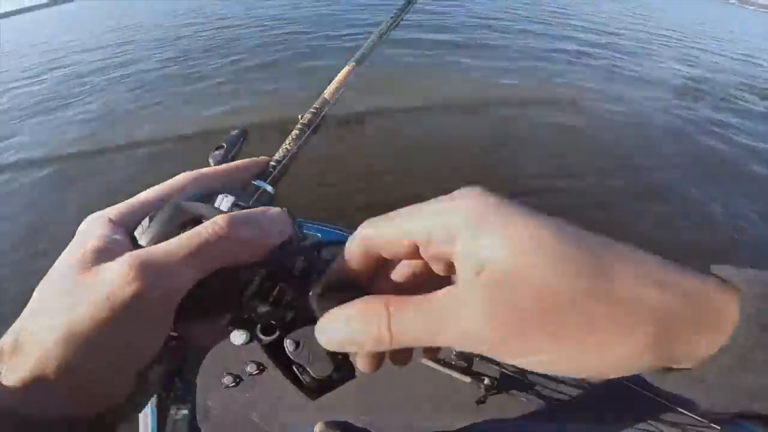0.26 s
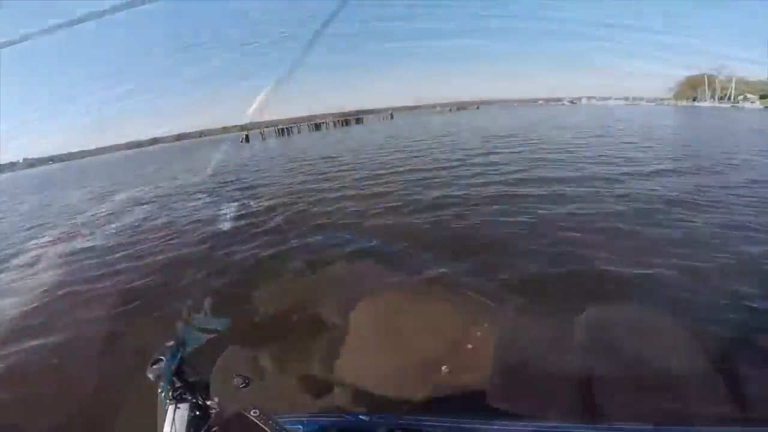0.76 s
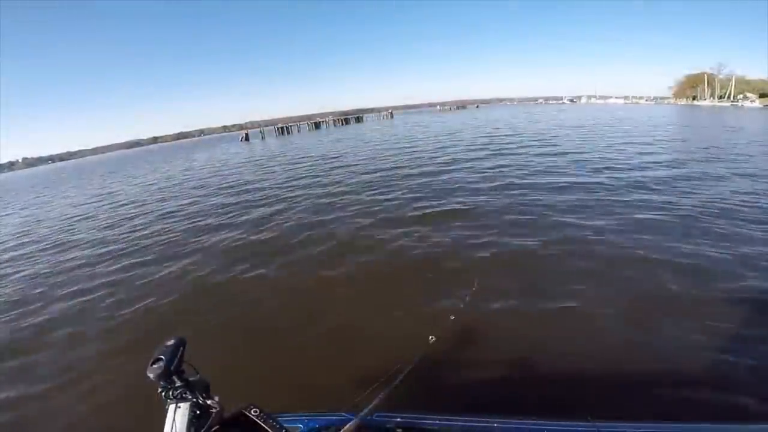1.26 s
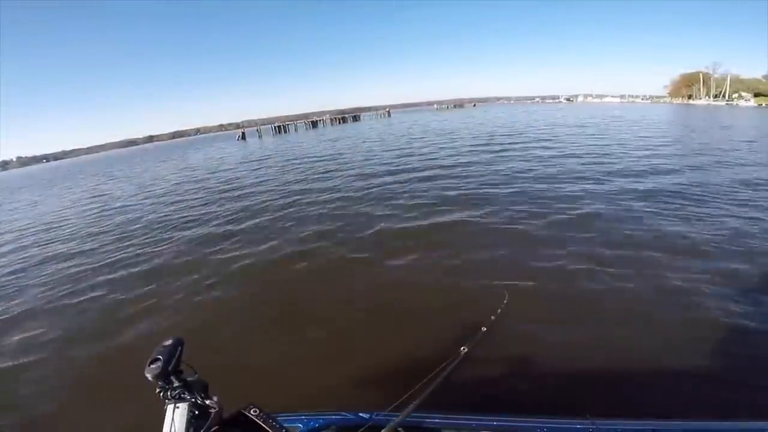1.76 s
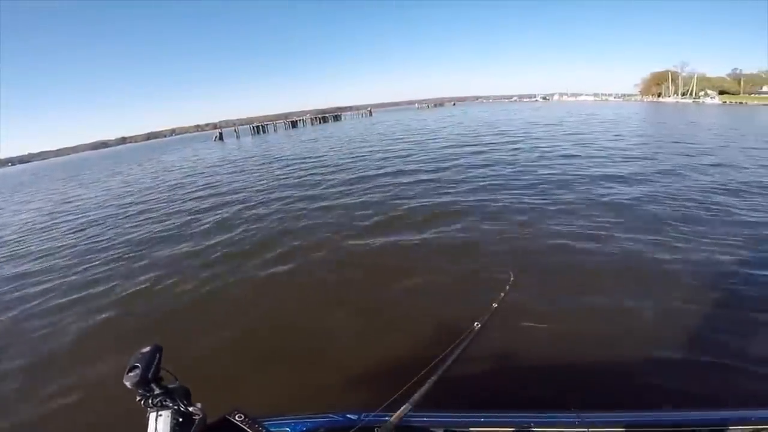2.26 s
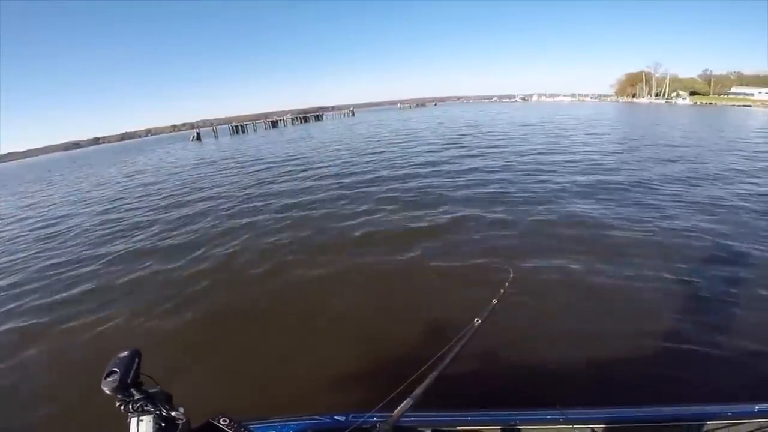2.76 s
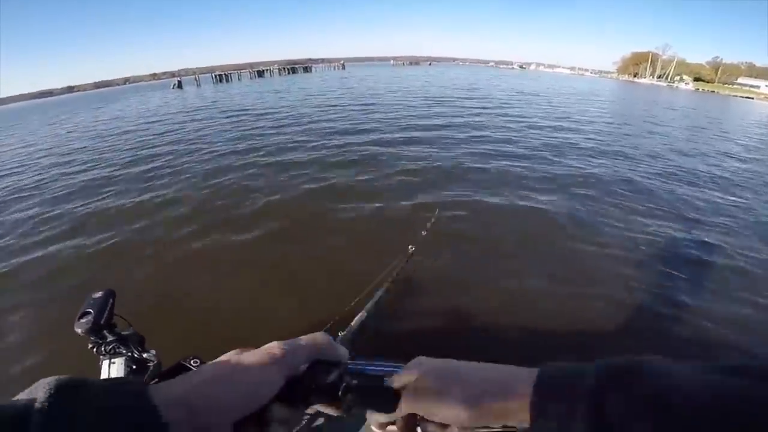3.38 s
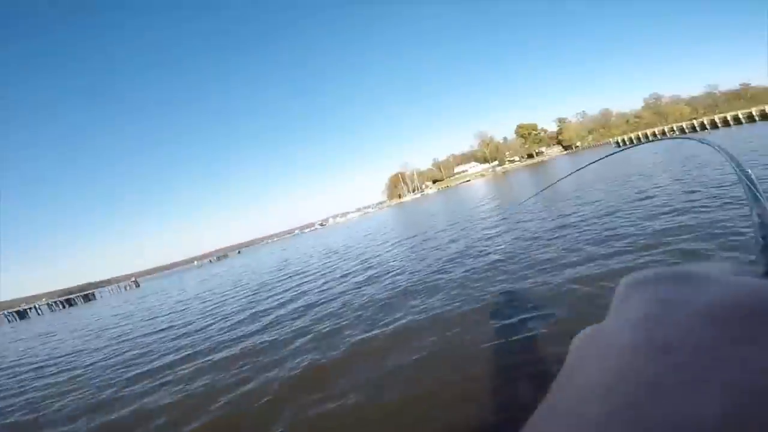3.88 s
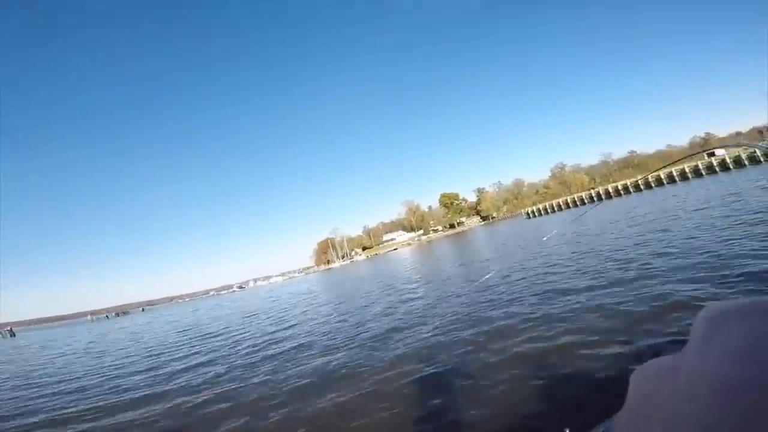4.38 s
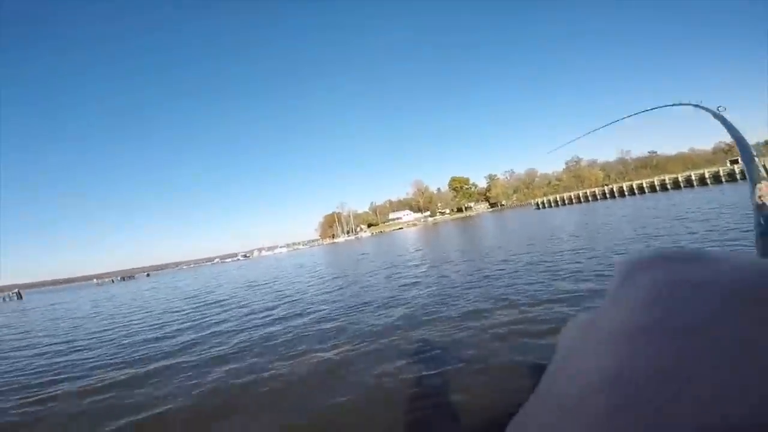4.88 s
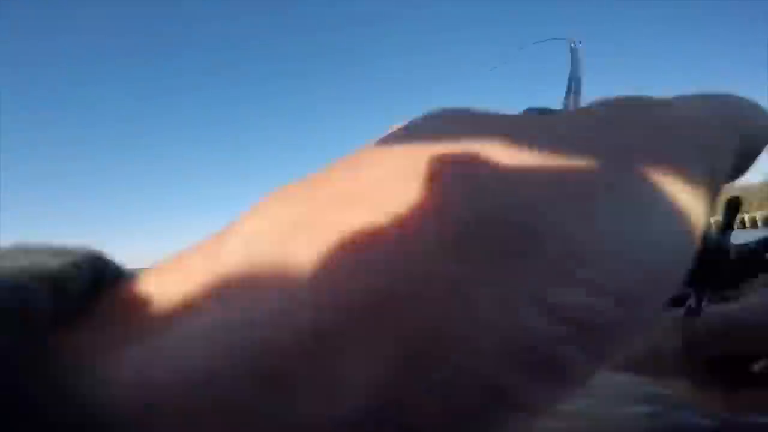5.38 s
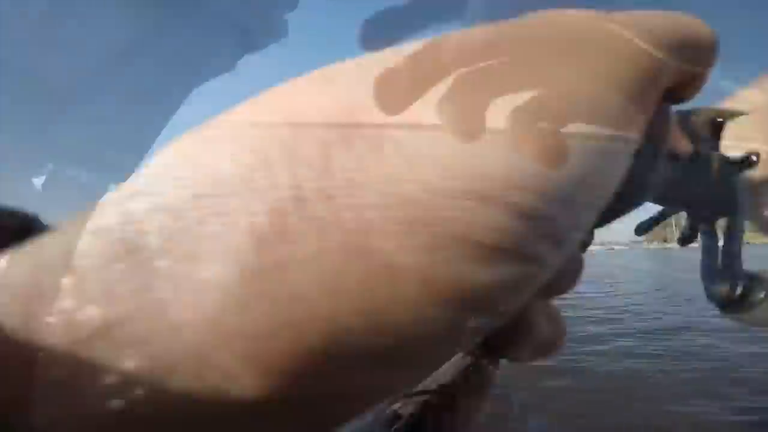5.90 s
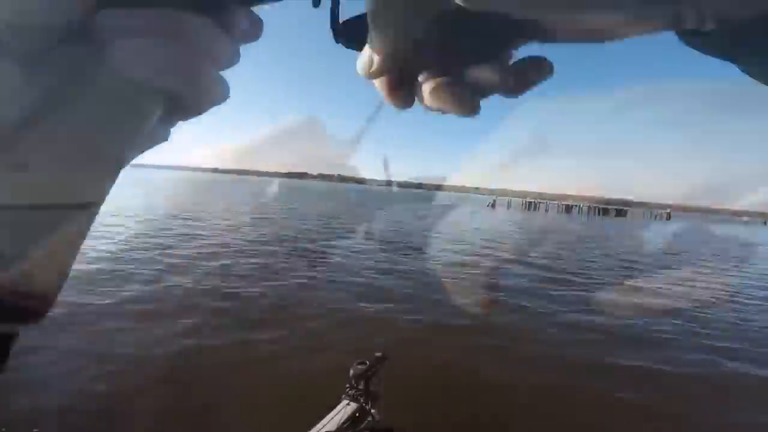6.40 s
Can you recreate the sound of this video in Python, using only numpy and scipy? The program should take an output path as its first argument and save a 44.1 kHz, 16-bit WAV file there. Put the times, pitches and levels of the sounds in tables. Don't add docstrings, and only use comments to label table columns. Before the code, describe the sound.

Outdoors on open water, heard very close to the hands. From 0 to 0.7 seconds a fishing reel ticks faintly in small pushes, with two dull bumps near 0.14 and a breathy spool whoosh dying away by 0.9. Until 3 seconds it is quiet: soft lapping, low wind buffeting, tiny drips, a plop and muted bumps around 2.0 to 2.3, another deeper plop at 2.7. From 3.1 to 3.6 slack line is wound with a grainy gear whir and light taps. At 3.6 to 3.8 the rod jerks: heavy low thumps, hard knocks and a brief rattle. Cloth rustles until 4.5, with a tiny squeak at 4.25. From 4.67 the loaded reel clatters loudly in dense, uneven bursts with short gaps, bright chinks, notably at 5.64, line hum, drag fizz and stronger wind. It weakens around 6.0 to 6.3, then knocks hollowly again until the cut at about 6.65.

```python
import sys
import numpy as np
from scipy import signal
from scipy.fft import rfft, irfft, next_fast_len
from scipy.io import wavfile
from scipy.ndimage import uniform_filter1d

SR = 44100
rng = np.random.default_rng(int(sys.argv[2]) if len(sys.argv) > 2 else 0)


def magnitude_from_level(level_db):
    exponent = np.asarray(level_db, float) / 20
    return 10 ** exponent


def inscribe(sig):
    pcm = np.round(np.clip(np.atleast_2d(sig).T, -1, 1) * 32767)
    wavfile.write(sys.argv[1], SR, pcm.astype(np.int16))


N = 293165
CREEP_S = 0.005


def ratchet():
    # f/Hz, width/Hz, level/dB
    shell_modes = [(160, 45, -15), (405, 75, -11), (705, 115, 5), (820, 140, 2)]
    pawl_modes = [(4960, 490, -6), (6096, 370, 2.5), (7300, 400, -4), (8180, 650, 3.5), (9890, 330, -3.5),
                  (11150, 1500, -4.5), (13100, 1000, -6), (14300, 390, -5.5)]
    # t/s, palm hollow/dB, spool cage/dB, top plate/dB, handle rim/dB
    reel_balance = [(4.75, 4.5, 3, -0.5, -20), (4.95, -1, -2, 2, -9), (5.2, 8, -9, 0.5, -17),
                    (5.4, 3, 7, -4, -1), (5.86, 4.5, -2, -7, -1), (5.92, 10.5, 2.5, -2.5, 0),
                    (6.3, -3, 2, -5.5, 0), (6.35, 12, 9, 9.5, 9)]
    shell_trim_db, frame_trim_db, pawl_trim_db = -1.7, -0.3, -0.18
    out = np.zeros(N)
    hollow, cage, plate, rim = along(reel_balance)
    for s, shell_db, frame_db, pawl_db in teeth():
        at = round(s * SR)
        start = s + 0.0001 - CREEP_S
        shell, shell_share = rings(seated(shell_modes))
        frame, frame_share = rings(seated(frame_at(s)))
        pawl, pawl_share = rings(seated(pawl_modes))
        shell_share = shell_share * [[1], [hollow[at]], [1], [1]]
        frame_share = frame_share * [[cage[at]], [1], [plate[at]], [plate[at] / max(rim[at], 1)]]
        pawl_share[2] *= rim[at]
        thud = struck((shell, shell_share), shell_db + shell_trim_db, 0.0004, -20, 0.006)
        knock = struck((frame, frame_share), frame_db + frame_trim_db, 0.0006, -18.5, 0.0055)
        ring = struck((pawl, pawl_share), pawl_db + pawl_trim_db, 0.0005, -18.5, 0.0038)
        add(out, start - 0.0006, thud)
        add(out, start, knock)
        add(out, start, ring)
    return out


def teeth():
    # t/s, shell level/dB, frame level/dB, pawl level/dB
    loaded_teeth = [(4.6734, -14.5, -11, -13.5), (4.6828, -10.5, -12.5, -9.5), (4.6903, -14.5, -10, -10.5),
                    (4.6936, -14, -14, -30), (4.7146, -12, -10.5, -8.5), (4.7281, -15, -14.5, -9),
                    (4.7406, -14.5, -13.5, -14.5), (4.8195, -16.5, -13.5, -18), (4.8292, -15, -13, -10.5),
                    (4.8704, -15, -14.5, -13.5), (4.8799, -16, -12, -15), (4.9076, -15, -10, -12),
                    (4.9171, -16.5, -15, -20), (4.9303, -12.5, -21, -15), (4.9374, -17, -12, -18),
                    (4.941, -21, -8.5, -22), (4.9452, -11, -21, -22), (4.9484, -13.5, -12, -9),
                    (4.9542, -16, -13, -24), (4.9581, -13, -11, -24), (4.9622, -20, -11, -13),
                    (4.9669, -18, -12, -27), (4.9708, -14, -9.5, -13.5), (4.9782, -15.5, -20, -21),
                    (4.9848, -26, -18, -23), (4.9912, -17, -16, -15.5), (5.008, -21, -14.5, -20),
                    (5.018, -18, -19, -16), (5.0272, -16, -15.5, -16.5), (5.0837, -20.5, -13.5, -17),
                    (5.0938, -18.5, -14.5, -14.5), (5.1198, -31, -19, -16.5), (5.1279, -12, -10, -15),
                    (5.145, -12.5, -14, -21), (5.1495, -25, -19, -14), (5.1563, -22, -17, -15),
                    (5.1596, -20, -15.5, -22), (5.1625, -18, -10, -15), (5.1684, -26, -9, -16),
                    (5.172, -18.5, -13, -16), (5.1741, -23, -12.5, -13), (5.1759, -13, -9, -8),
                    (5.183, -14.5, -15, -21), (5.1893, -15.5, -16, -19), (5.195, -17, -9.5, -13),
                    (5.1987, -34, -26, -31), (5.202, -17.5, -16, -12), (5.21, -19.5, -20, -23),
                    (5.232, -22, -17.5, -17), (5.2416, -23, -21, -21), (5.2658, -33, -37, -28),
                    (5.294, -17, -12.5, -15), (5.3767, -19, -14.5, -19), (5.382, -17, -15.5, -16.5),
                    (5.3863, -14.5, -13, -14), (5.3927, -18, -11.5, -11), (5.4001, -12, -13, -15),
                    (5.519, -29, -16.5, -19), (5.525, -18.5, -15.5, -11.5), (5.5327, -23, -10, -19),
                    (5.541, -26, -15.5, -14), (5.5496, -31, -19, -18), (5.5538, -16.5, -13.5, -10.5),
                    (5.5575, -18, -12, -10), (5.5628, -13.5, -8, -11.5), (5.568, -21, -14, -21),
                    (5.5711, -19, -9.5, -12), (5.5779, -20, -16, -17), (5.587, -21, -16, -15),
                    (5.593, -16, -19, -12.5), (5.599, -17, -12, -14), (5.604, -18, -15, -11),
                    (5.6127, -22, -18.5, -17.5), (5.6189, -27, -32, -45), (5.6437, -51, -32, -25.5),
                    (5.7154, -26, -15, -15), (5.7236, -18, -9.5, -16), (5.7357, -24, -13, -10.5),
                    (5.7437, -16, -19, -15), (5.7479, -24, -8.5, -12), (5.7517, -13.5, -11.5, -12),
                    (5.7559, -18, -11.5, -16), (5.759, -15, -12, -20),
                    (5.7629, -22, -13, -13), (5.767, -18, -12, -11), (5.7725, -15, -13.5, -10.5),
                   (5.7794, -15.5, -14, -15), (5.7995, -24, -14, -16), (5.8088, -21.5, -17.5, -18.5),
                   (5.8242, -30, -39, -31), (5.8333, -24, -15.5, -17.5), (5.856, -28, -16, -22),
                   (5.8615, -24, -12, -12), (5.87, -18, -15.5, -15.5), (5.8892, -24, -18, -28),
                   (5.969, -17.5, -23, -17), (5.976, -32, -26, -27), (5.9849, -33, -27.5, -29),
                   (6.0766, -39, -22, -24.5), (6.0845, -35, -23, -21), (6.0917, -25.5, -17, -21),
                   (6.1024, -27, -20, -20), (6.1112, -21, -23, -18), (6.1173, -21, -18, -23),
                   (6.12, -23, -22, -19), (6.125, -27, -20, -19), (6.129, -23.5, -20, -16.5),
                   (6.1347, -24, -25, -20), (6.1396, -22, -23, -20), (6.1595, -32, -22.5, -26.5),
                   (6.2365, -32, -20.5, -26.5), (6.2425, -26, -19.5, -23), (6.252, -32, -27, -30),
                   (6.2658, -30, -21, -22.5), (6.2743, -32, -25, -28), (6.2784, -20, -20, -25),
                   (6.2828, -21.5, -22, -22), (6.2878, -23, -17.5, -21), (6.293, -31, -28, -27),
                   (6.299, -22.5, -36, -23),
                    (6.3051, -23, -22, -23), (6.3109, -30, -15, -18.5), (6.3243, -39, -29, -31),
                  (6.3315, -34, -36, -26), (6.3513, -30, -9.5, -15), (6.3613, -30, -12, -17.5),
                  (6.3711, -20.5, -11, -16), (6.3952, -21, -17, -19), (6.4002, -19.5, -9, -10),
                  (6.409, -21.5, -16, -15.5), (6.5536, -26, -17, -13.5), (6.5635, -31, -5, -12.5),
                  (6.5902, -21, -6.5, -12), (6.5984, -25, -10, -21), (6.605, -19, -8, -12),
                  (6.612, -20.5, -11.5, -14), (6.633, -20, -17, -18), (6.6394, -19, -8, -10)]
    # first tooth t/s, last tooth t/s, count, shell/dB, frame/dB, pawl/dB
    fast_runs = [
        (5.895, 5.9077, 6, -19, -15, -16.5),
        (5.9135, 5.927, 8, -19, -15.5, -16),
        (5.929, 5.964, 15, -21, -17.5, -17.5),
    ]
    slowing, stumble = 1.05, 0.09
    frame_spread_db, pawl_spread_db = 1.6, 2.4
    rows = loaded_teeth
    chances = rng.standard_normal((len(fast_runs), 20, 3))
    for (first, last, count, shell_db, frame_db, pawl_db), chance in zip(fast_runs, chances):
        late, knock, ring = chance[:count].T
        step = np.linspace(0, 1, count)
        stray = stumble * late * np.sin(np.pi * step) ** 0.5 / (count - 1)
        times = first + (last - first) * (step ** slowing + stray)
        knock = frame_spread_db * knock
        rows += zip(times, shell_db + knock, frame_db + knock, pawl_db + pawl_spread_db * ring)
    return rows


def frame_at(s):
    # f/Hz, width/Hz, level/dB
    frame_modes = [(1660, 250, 3), (2044, 490, 7), (2830, 570, 7.5), (3710, 120, -6)]
    lower_from_s, plate_ratio = 6.34, 0.88
    modes = np.array(frame_modes, float)
    modes[2, 0] *= plate_ratio if s > lower_from_s else 1
    return modes


def seated(modes):
    off = 0.02 * rng.standard_normal(len(modes))
    return [(hz * (1 + shift), width, db) for (hz, width, db), shift in zip(modes, off)]


def rings(modes, size=700):
    t = np.arange(size) / SR
    hz, width, db = np.transpose(modes)[:, :, None]
    decay = t * np.exp(-2 * np.pi * width * t)
    return decay * np.sin(2 * np.pi * hz * t), magnitude_from_level(db)


def struck(body, db, length_s, tail_db, tail_s, size=1100):
    modes, share = body
    t = np.arange(size) / SR - CREEP_S
    creep = -t + (t / 0.0011) ** 4 * length_s
    slip = np.exp(-np.where(t > 0, t, creep) / length_s)
    buzz = magnitude_from_level(tail_db) * np.exp(-np.where(t > 0, t / tail_s, 1.2 - t / 0.0012))
    scrape = (slip + buzz) * rng.standard_normal((len(modes), size))
    bite = 0.8
    scrape[:, round(CREEP_S * SR)] += bite * np.sqrt(length_s * SR) * rng.choice([-1, 1])
    parts = signal.fftconvolve(scrape, modes, axes=1)
    share = share * magnitude_from_level(2.4 * rng.standard_normal(share.shape))
    sound = (share * parts / np.linalg.norm(parts, axis=1, keepdims=True)).sum(0)
    peak = np.sqrt(uniform_filter1d(sound ** 2, size=60).max())
    return sound * magnitude_from_level(db) / peak


def ticking():
    # middle t/s, half length t/s, level/dB
    pushes = [
        (0, 0.0099, -49),
        (0.124, 0.035, -56),
        (0.212, 0.037, -60),
        (0.34, 0.1, -54.5),
        (0.578, 0.084, -64),
    ]
    ticks_per_s, end_s = 110, 0.66
    at = np.arange(0, end_s, 1 / ticks_per_s)
    out = np.zeros(N)
    pawl = rings([(3750, 380, -2.5), (6100, 260, 5), (8200, 400, -1.5)])
    for when, push, (late, uneven) in zip(at, swells(pushes, at)[0], rng.standard_normal((100, 2))):
        tick = struck(pawl, 3.4 * uneven, 0.00047, -26, 0.0027)
        add(out, when + 0.0008 * late, push * tick)
    return out


def spool():
    # t/s, level/dB
    coast = [(0, -52.5), (.2, -51.5), (.45, -51.5), (.65, -57), (.8, -62), (.9, -100)]
    # f/Hz, level/dB
    spool_spectrum = [(500, -3), (700, 0), (1150, -7), (1280, -2.5), (1500, -7), (2100, -11.5),
                      (2700, -21.5), (5000, -33), (10000, -29), (15000, -50)]
    whoosh = colour(grains(110, 2.4, 0.67), spool_spectrum)
    whistles = 0.21 * wavering(1290, 25) + 0.2 * wavering(1950, 30)
    return along(coast)[0] * evened(lumps(70, 0.84) * (whoosh + whistles))


def gears():
    # t/s, level/dB
    winding = [(3, -100), (3.05, -66), (3.14, -56), (3.205, -59), (3.225, -53), (3.32, -49.5), (3.37, -52),
               (3.43, -55.5), (3.5, -57), (3.56, -63), (3.62, -100)]
    # f/Hz, level/dB
    gear_spectrum = [(1200, -9.5), (1750, -2), (2100, 4), (2550, -5.5), (3300, -12.5), (4000, -19),
                     (4650, -13.5), (5500, -22), (6600, -16), (7500, -21), (8300, -16), (9100, -25),
                     (9850, -11.5), (10800, -28), (15000, -32)]
    return along(winding)[0] * evened(meshing() * colour(rng.standard_normal(N), gear_spectrum))


def meshing():
    mesh_per_s, depth_db, spread_db = 216, 14, 3
    turns = np.cumsum(mesh_per_s * lumps(12, 0.4)) / SR
    tooth = rng.standard_normal(2000)[turns.astype(int) % 2000]
    return uniform_filter1d(magnitude_from_level(spread_db * tooth - depth_db * (turns % 1)), size=40)


def line():
    # f/Hz, level/dB
    hum_spectrum = [(400, -21), (850, -8), (1350, -11), (1600, -2), (2150, -3), (2500, -11), (3200, -12),
                    (3700, -19), (6000, -32)]
    fizz_spectrum = [(2500, -16), (4500, -4), (5500, -3), (7300, -7), (9200, 4), (10500, -9), (12500, -17),
                     (15000, -14)]
    hum_level, fizz_level = strain()
    whirr = colour(grains(220, 1.4, 0.4), hum_spectrum)
    whistles = 0.6 * wavering(1650, 90) + 0.6 * wavering(1950, 110)
    hum = hum_level * evened(lumps(53, 2.2) * (whirr + whistles))
    fizz = lumps(45, 2.5) * colour(grains(160, 4.5, 0.5), fizz_spectrum)
    return hum + fizz_level * evened(fizz)


def strain():
    # t/s, level/dB
    line_load = [(3.56, -63), (4.1, -66.5), (4.65, -62.5), (4.85, -42), (5.3, -41), (5.8, -37), (6, -49.5),
                 (6.2, -44), (6.35, -37), (6.65, -39)]
    # middle t/s, half length t/s, hum/dB, fizz/dB
    rubs = [(3.615, 0.037, -48.5, -52), (3.69, 0.019, -40, -42), (3.74, 0.031, -54, -52),
            (3.81, 0.017, -52, -51), (4.27, 0.05, -62, -70), (4.51, 0.052, -68, -72),
            (4.76, 0.095, -56, -69), (5.42, 0.032, -38.5, -43), (5.505, 0.023, -42, -45),
            (5.7, 0.033, -45, -47), (5.88, 0.12, -48, -48.5), (6.05, 0.033, -51, -56),
            (6.535, 0.016, -46, -46)]
    fizz_under_db = -18.5
    pull = along([(line_load[0][0] - 0.05, -110)] + line_load)[0]
    hum, fizz = swells(rubs, np.arange(N) / SR)
    return pull + hum, pull * magnitude_from_level(fizz_under_db) + fizz


def wavering(hz, width_hz):
    fuzz = colour(rng.standard_normal(N), [(width_hz, 0), (2 * width_hz, -30)])
    return fuzz * np.sin(2 * np.pi * np.cumsum(hz * lumps(5, 0.45)) / SR)


def thumps():
    # t/s, peak level/dB, f/Hz, t60/s
    blows = [(0.143, -20.5, 133, 0.095), (0.134, -22.5, 313, 0.036), (3.575, -13.5, 9.8, 0.24),
             (4.07, -30.5, 117, 0.11), (5.53, -28.5, 133, 0.18), (5.6, -21.5, 190, 0.085),
             (6.41, -32, 270, 0.085), (2.01, -32, 136, 0.21), (2.17, -28, 130, 0.13),
             (3.555, -30.5, 225, 0.099), (3.692, -6, 11, 0.38), (3.694, -19, 160, 0.067),
             (3.726, -3.5, 61, 0.033), (3.8142, -13.5, 222, 0.042), (3.8128, -10.5, 730, 0.0086),
             (3.8135, -13, 79, 0.1), (4.5, -30.5, 8.2, 0.48)]
    return bursts(blows, 0.02, -0.42)


def bursts(rows, rise_cycles, glide):
    out = np.zeros(N)
    for s, db, hz, t60 in rows:
        t = np.arange(round(t60 * SR)) / SR
        start = 1 - np.exp(-t * hz / rise_cycles)
        tone = np.sin(2 * np.pi * hz * t * (1 + glide * t / t60))
        add(out, s, magnitude_from_level(db - 60 * t / t60) * start * tone)
    return out


def rod_knocks():
    # t/s, low level/dB, low ring f/Hz, high level/dB
    jerk_knocks = [(3.6241, -32.5, 2230, -42), (3.6342, -29, 2100, -43), (3.635, -36, 3850, -48),
                   (3.6499, -30, 2060, -44), (3.6892, -25, 2170, -33), (3.696, -19, 3720, -29),
                   (3.6992, -29, 2400, -28), (3.7031, -22.5, 2430, -31), (3.7116, -34, 1500, -35),
                   (3.7158, -19, 2020, -49), (3.7264, -25.5, 2600, -34), (3.7333, -36, 2690, -38),
                   (3.7638, -45, 2690, -45), (3.768, -60, 2700, -45), (3.7846, -38, 2780, -45),
                   (3.7991, -46, 2700, -43), (3.8135, -31.5, 2720, -39), (3.8693, -53, 2710, -51),
                   (4.478, -45, 4000, -53), (4.5012, -42.5, 2590, -41), (4.6195, -46, 2480, -45.5)]
    return hard_parts(jerk_knocks, 8700)


def taps():
    # t/s, low level/dB, low ring f/Hz, high level/dB
    light_taps = [(.1092, -57, 3300, -62), (.1396, -59, 3000, -60), (.2049, -58, 3500, -60),
                  (.2224, -57, 3000, -62), (.2987, -63, 3500, -58), (.3162, -63, 3200, -59),
                  (.4025, -57, 3300, -52), (.7502, -58, 2600, -66), (3.1411, -56, 2100, -60),
                  (3.2415, -53, 2100, -60), (3.3365, -51, 2100, -59), (3.4788, -58, 4300, -61),
                  (.7319, -57, 2600, -54), (.7696, -70, 1210, -60), (1.0206, -55.5, 4640, -70),
                  (1.9986, -50.5, 2530, -66), (2.707, -56.5, 2580, -68), (3.0726, -53, 2400, -65),
                  (3.1838, -59, 1920, -55), (3.2955, -49, 2110, -55), (3.3876, -48, 1870, -55),
                  (3.4064, -43, 3120, -43.5), (4.0249, -52, 1210, -53)]
    return hard_parts(light_taps, 5570)


def snap_ring():
    # t/s, low level/dB, low ring f/Hz, high level/dB
    rattles = [
        (3.69, -45, 6200, -33),
        (3.7125, -43, 6000, -32),
        (3.755, -47, 6000, -54),
    ]
    return hard_parts(rattles, 13600)


def hard_parts(rows, high_hz):
    out = np.zeros(N)
    for s, low_db, low_hz, high_db in rows:
        low = rings([(low_hz, 350, 0), (0.42 * low_hz, 1500, -7)])
        high = rings([(high_hz, 700, 0), (0.74 * high_hz, 2500, -5)])
        add(out, s - CREEP_S, struck(low, low_db, 0.00036, -20, 0.0079))
        add(out, s - CREEP_S, struck(high, high_db, 0.00035, -19, 0.0046))
    return out


def chinks():
    # t/s, level/dB
    knob_chinks = [(4.7573, -33), (4.7948, -40), (4.8016, -38), (5.2663, -25), (5.4262, -29.5),
                   (5.4585, -32), (5.463, -26), (5.644, -17.5), (5.6645, -38), (5.6836, -40), (5.8449, -33),
                   (5.855, -25), (6.0035, -44), (6.0088, -40), (6.536, -38)]
    out = np.zeros(N)
    for s, db in knob_chinks:
        pin = rings(seated([(11200, 1000, -4), (14100, 1100, -1), (8500, 1500, -10)]))
        add(out, s - CREEP_S, struck(pin, db, 0.0005, -24, 0.003))
    return out


def squeak():
    # t/s, f/Hz, level/dB
    grip_squeak = [(4.24, 760, -70), (4.255, 830, -59), (4.285, 1000, -57), (4.3, 900, -70)]
    s, hz, db = np.transpose(grip_squeak)
    t = np.arange(s[0], s[-1], 1 / SR)
    turn = 2 * np.pi * np.cumsum(np.interp(t, s, hz)) / SR
    tone = np.sin(turn) + 0.25 * np.sin(2 * turn) + np.sin(3 * turn)
    out = np.zeros(N)
    add(out, s[0], magnitude_from_level(np.interp(t, s, db)) * tone)
    return out


def jacket():
    # middle t/s, half length t/s, level/dB
    creases = [(3.87, 0.037, -47.5), (3.96, 0.055, -51), (4.17, 0.076, -54), (4.28, 0.049, -49.5),
               (4.38, 0.042, -53.5), (4.51, 0.087, -51)]
    # f/Hz, level/dB
    cloth_spectrum = [(300, -16), (700, 3.5), (1100, -1.5), (1700, -13), (2800, -13), (3800, -25),
                      (5400, -20.5), (7000, -41)]
    rustle = evened(lumps(40, 2.7) * colour(grains(270, 4.0, 1.0), cloth_spectrum))
    return swells(creases, np.arange(N) / SR)[0] * rustle


def water():
    # t/s, peak level/dB, f/Hz, t60/s
    plops = [(.902, -52, 1710, 0.027), (1.112, -43.5, 1570, 0.014), (1.316, -47, 1900, 0.0092),
             (1.998, -43.5, 1710, 0.03), (2.168, -36, 887, 0.023), (2.233, -37, 480, 0.23),
             (2.235, -48.5, 2400, .015), (2.471, -50, 1190, .03), (2.705, -38.5, 298, 0.2),
             (2.953, -44.5, 1360, 0.033), (3.89, -34.5, 1380, 0.016), (4.238, -39, 396, 0.09)]
    # t/s, level/dB
    water_level = [(0, -47), (.4, -54.5), (.9, -53.5), (3.4, -49), (3.9, -48.5), (4.6, -52.5), (5, -41),
                   (5.9, -48), (6.65, -52)]
    # f/Hz, level/dB
    wash_spectrum = [(150, -27), (300, -2.5), (450, -7), (650, -14.5), (1080, -24), (1730, -31.5),
                     (3500, -40), (6000, -50)]
    wash = colour(grains(60, 2.5, 0.33), wash_spectrum)
    drops = []
    for place, big, pitch in rng.random((N // 2000, 3)):
        drops.append((place * N / SR, -54 - 14 * pitch + 7 * big, 280 * 10 ** pitch, 0.014))
    return along(water_level)[0] * evened(lumps(27.5, 2.1) * wash) + bursts(plops + drops, 0.45, 0.079)


def wind():
    # t/s, level/dB
    gusts = [(0, -40.5), (.08, -41.5), (.9, -49), (1.05, -41), (1.3, -45.5), (3.45, -46.5), (3.6, -37),
             (3.9, -44.5), (4.1, -43.5), (4.55, -48.5), (4.85, -33.5), (5.1, -34.5), (5.35, -37.5),
             (5.5, -42.5), (5.75, -30.5), (5.93, -34.5), (6.05, -42.5), (6.65, -44.5)]
    # f/Hz, level/dB
    sway_spectrum = [(1, -44), (5, 16), (22, 5.5), (40, 1), (80, -57)]
    buffet_spectrum = [(20, -6.5), (40, 6.5), (120, -0.5), (250, -7.5), (500, -49)]
    buffet = along(gusts)[0]
    worked = along([(3.1, 1), (3.136, 6)])[0]
    sway = buffet ** 0.9 * worked
    low = sway * colour(rng.standard_normal(N), sway_spectrum)
    return low + buffet * evened(lumps(22.0, 0.44) * colour(rng.standard_normal(N), buffet_spectrum))


def evened(x):
    return x / np.sqrt(np.mean(x ** 2) + 1e-20)


def add(mix, s, sound):
    part = mix[max(round(s * SR), 0):][:len(sound)]
    part += sound[:len(part)]


def along(rows):
    s, *columns = np.transpose(rows)
    t = np.arange(N) / SR
    return [magnitude_from_level(np.interp(t, s, column)) for column in columns]


def swells(rows, t):
    middle, half, *levels = np.transpose(rows)[:, :, None]
    fall_db = 12 * np.minimum(((t - middle) / half) ** 2, 9)
    return [magnitude_from_level(db - fall_db).sum(0) for db in levels]


def colour(x, spectrum):
    hz, db = np.transpose(spectrum)
    size = next_fast_len(len(x))
    bins = np.fft.rfftfreq(size, 1 / SR)
    gain = magnitude_from_level(np.interp(np.log(bins + 0.093), np.log(hz), db))
    return evened(irfft(rfft(x, size) * gain, size)[:len(x)])


def lumps(per_s, depth_db):
    return magnitude_from_level(depth_db * colour(rng.standard_normal(N), [(per_s, 0), (3 * per_s, -40)]))


def grains(per_s, spread_db, share):
    sizes = magnitude_from_level(spread_db * np.minimum(rng.exponential(1, N), 2))
    clicks = (rng.random(N) < per_s / SR) * sizes
    return rng.standard_normal(N) + share * evened(clicks)


def scene():
    reel = ratchet() + ticking() + spool() + gears() + line()
    hard = thumps() + rod_knocks() + taps() + snap_ring() + chinks() + squeak()
    return (reel + hard + jacket() + water() + wind())[None]


def roll_off(x):
    return signal.sosfilt(signal.butter(12, 16550, fs=SR, output="sos"), x)


def record(dry):
    hiss_db, edge_hz, ceiling = -75, 15450, 1.1
    noisy = dry + magnitude_from_level(hiss_db) * rng.standard_normal(dry.shape)
    limited = signal.oaconvolve(noisy, signal.firwin(131, edge_hz, fs=SR)[None], "same")
    squeezed = ceiling * np.tanh(limited / ceiling)
    return roll_off(squeezed)


dry = scene()
out = record(dry)
inscribe(out)
```